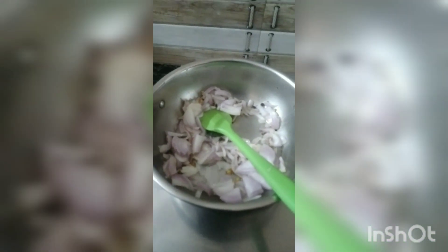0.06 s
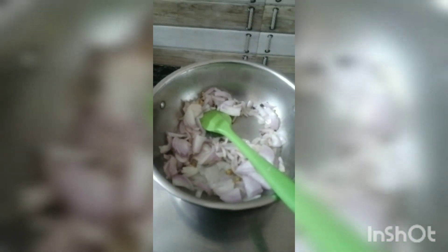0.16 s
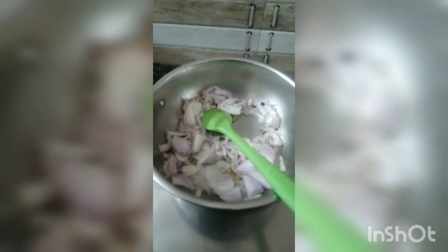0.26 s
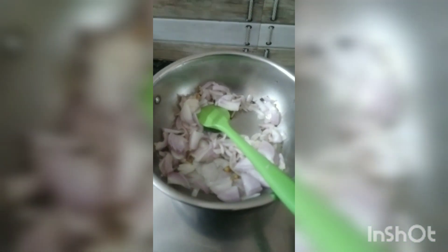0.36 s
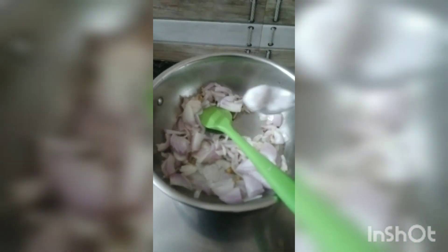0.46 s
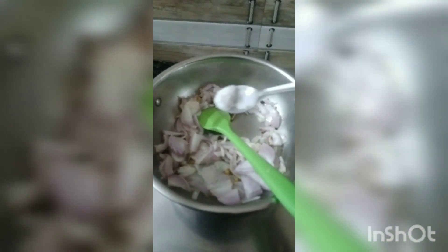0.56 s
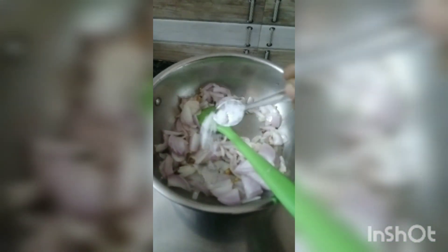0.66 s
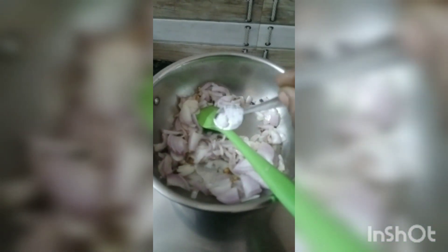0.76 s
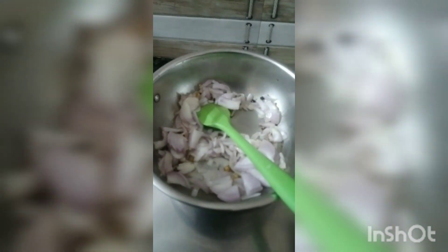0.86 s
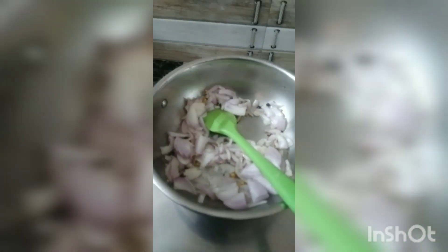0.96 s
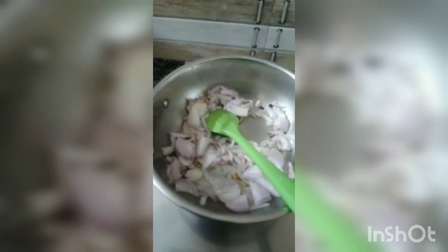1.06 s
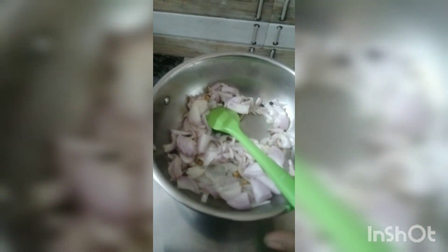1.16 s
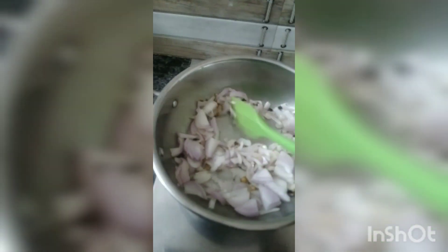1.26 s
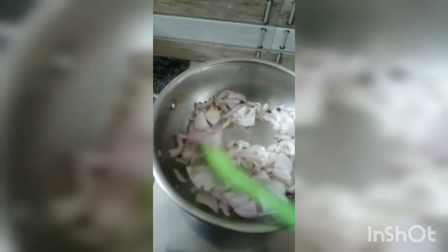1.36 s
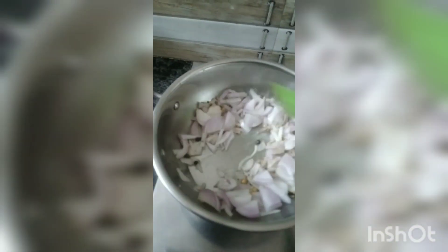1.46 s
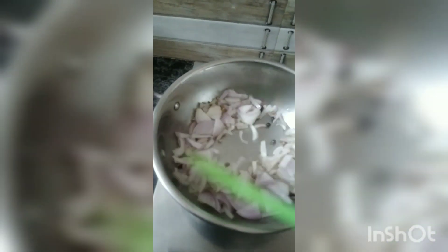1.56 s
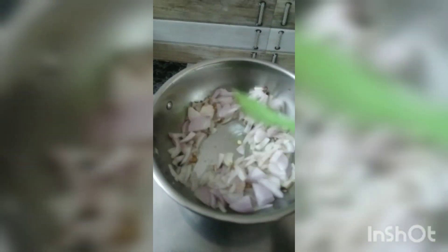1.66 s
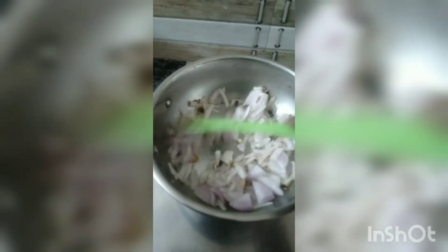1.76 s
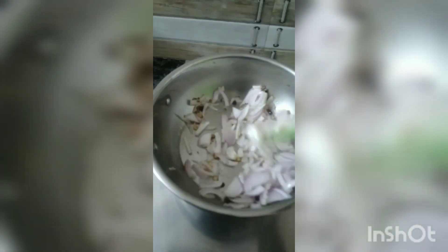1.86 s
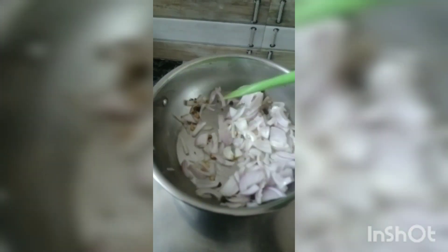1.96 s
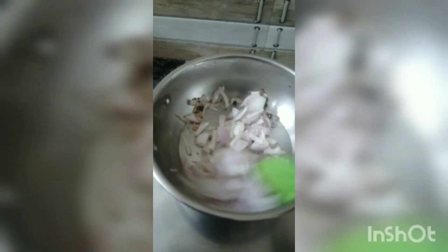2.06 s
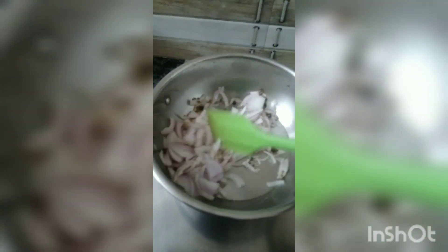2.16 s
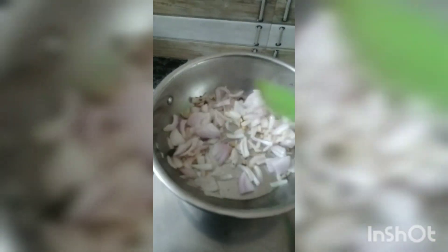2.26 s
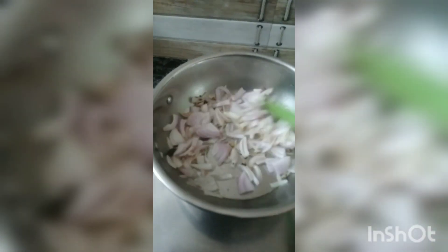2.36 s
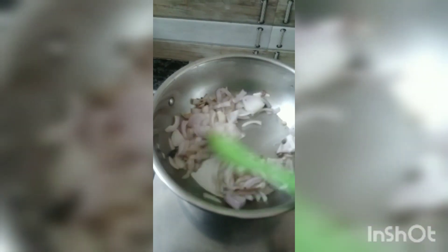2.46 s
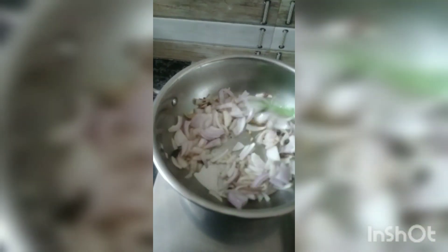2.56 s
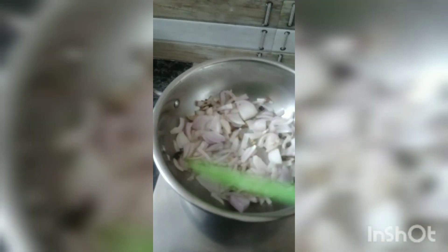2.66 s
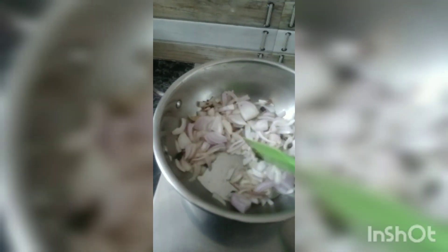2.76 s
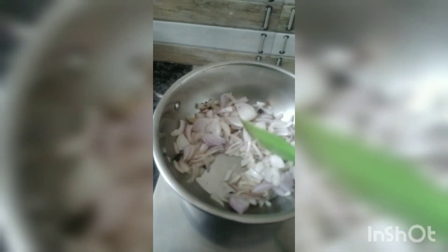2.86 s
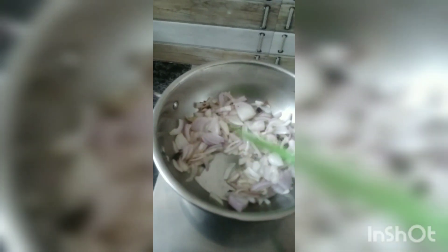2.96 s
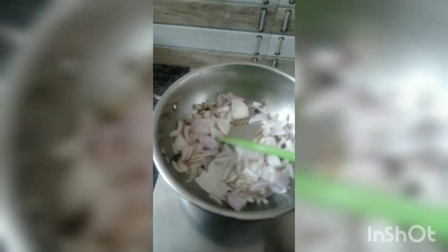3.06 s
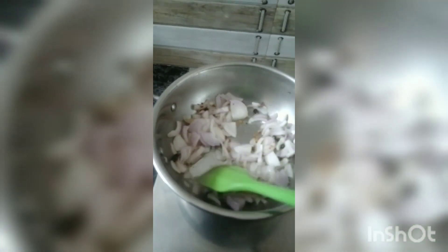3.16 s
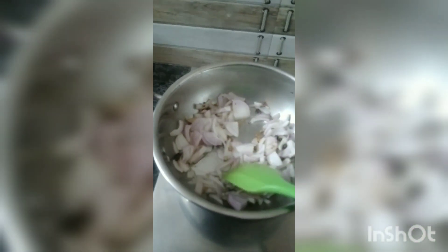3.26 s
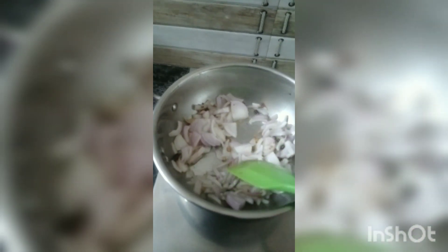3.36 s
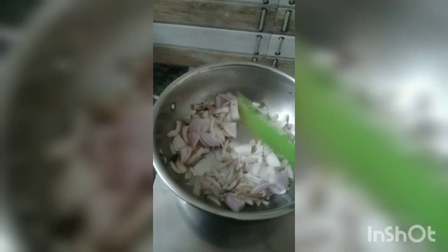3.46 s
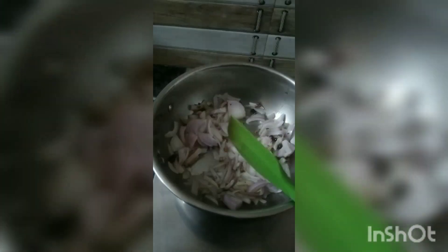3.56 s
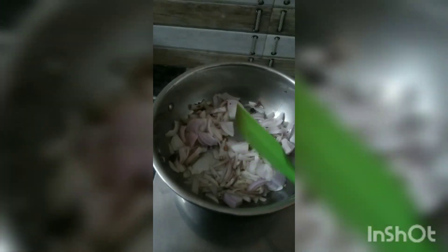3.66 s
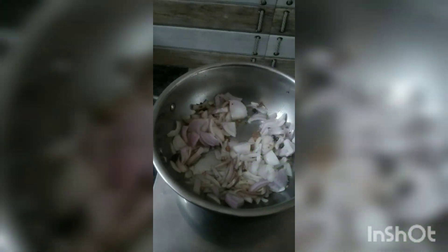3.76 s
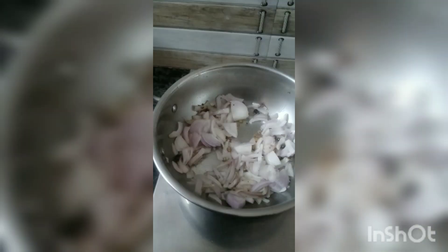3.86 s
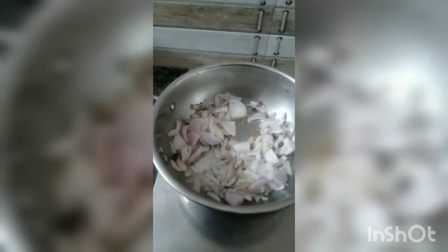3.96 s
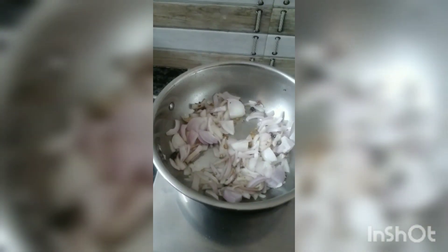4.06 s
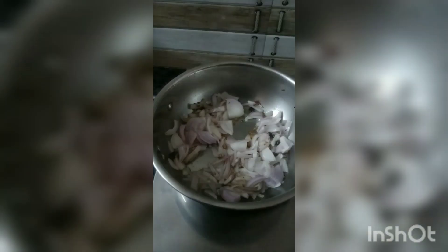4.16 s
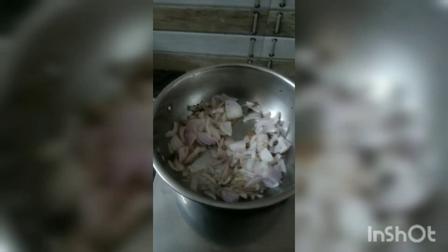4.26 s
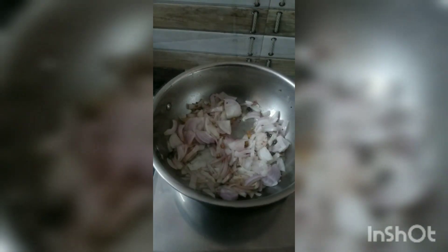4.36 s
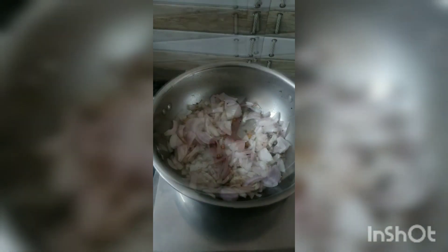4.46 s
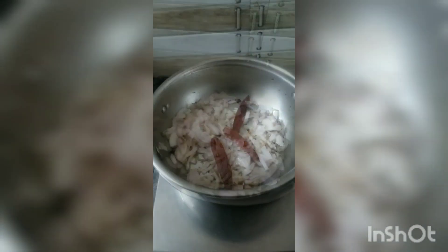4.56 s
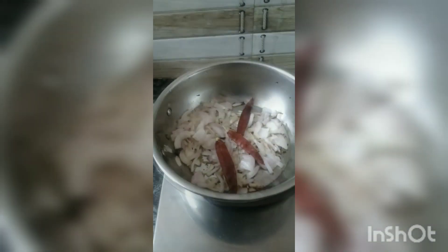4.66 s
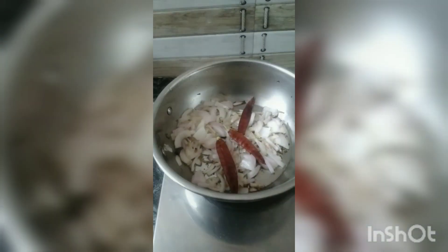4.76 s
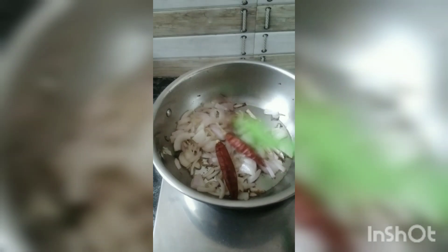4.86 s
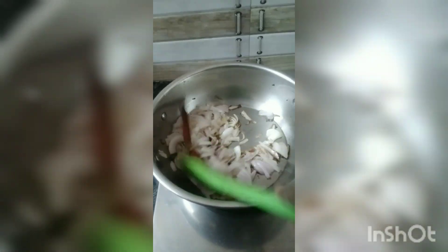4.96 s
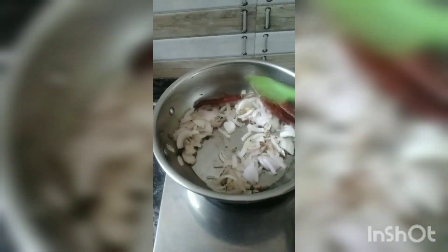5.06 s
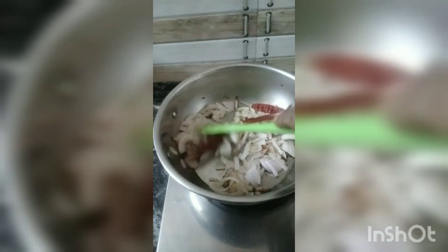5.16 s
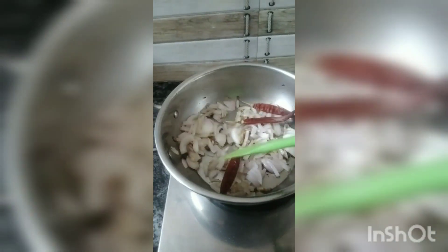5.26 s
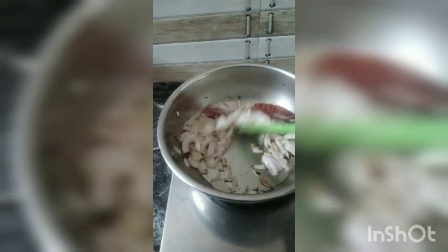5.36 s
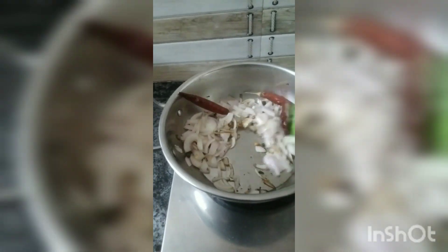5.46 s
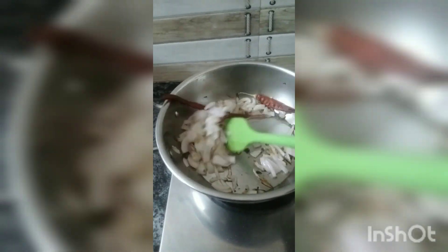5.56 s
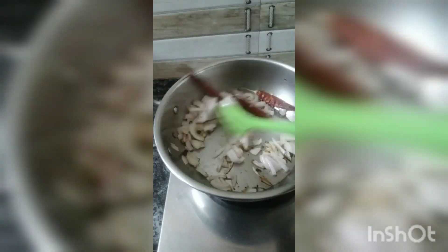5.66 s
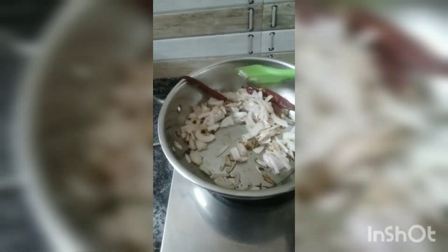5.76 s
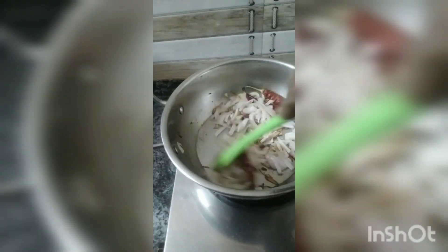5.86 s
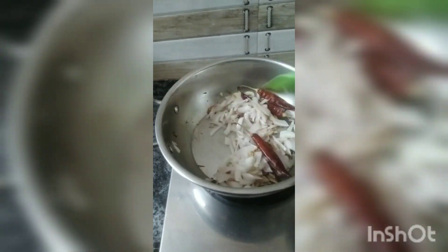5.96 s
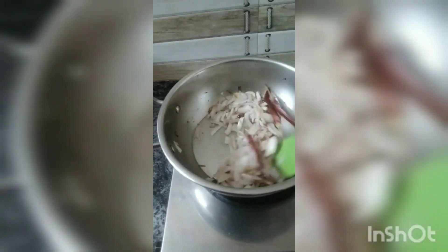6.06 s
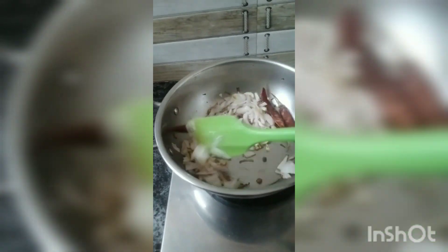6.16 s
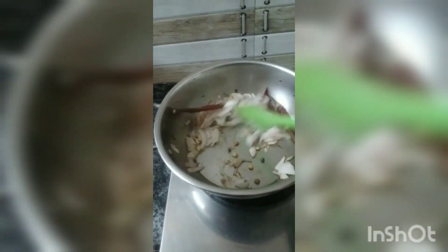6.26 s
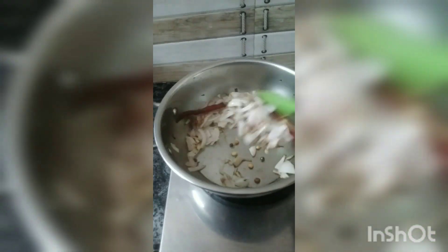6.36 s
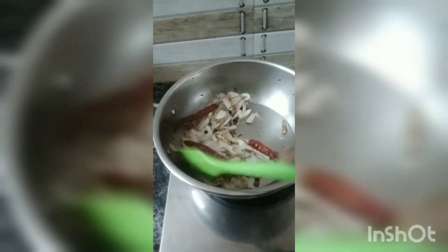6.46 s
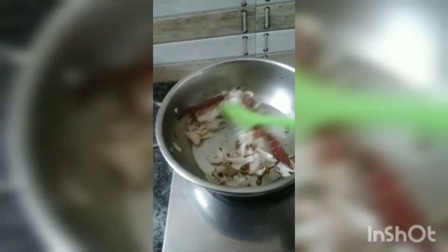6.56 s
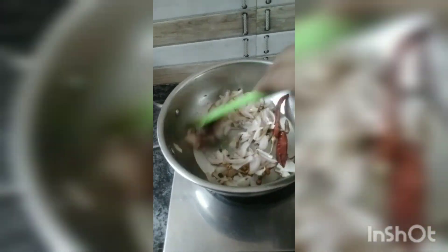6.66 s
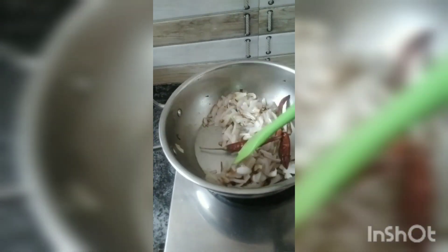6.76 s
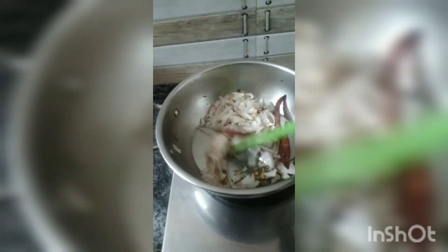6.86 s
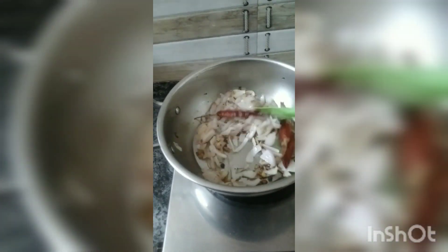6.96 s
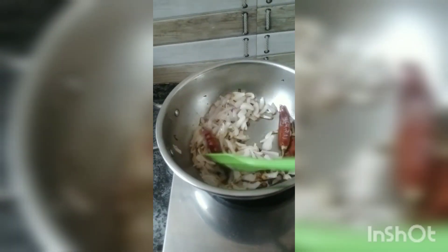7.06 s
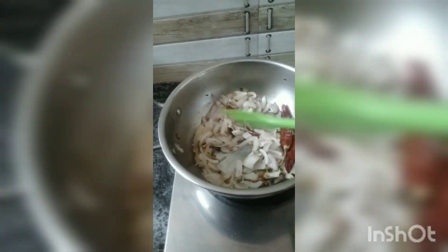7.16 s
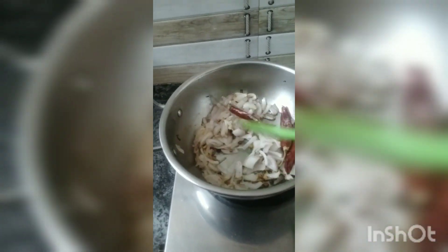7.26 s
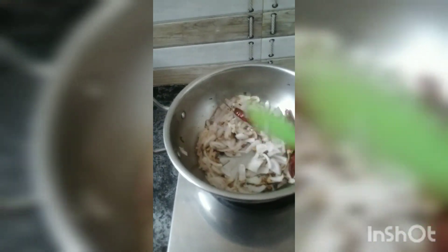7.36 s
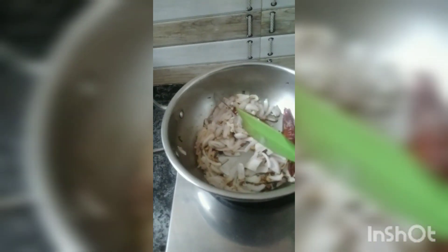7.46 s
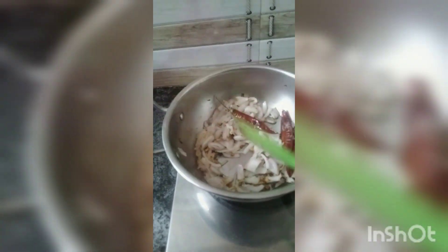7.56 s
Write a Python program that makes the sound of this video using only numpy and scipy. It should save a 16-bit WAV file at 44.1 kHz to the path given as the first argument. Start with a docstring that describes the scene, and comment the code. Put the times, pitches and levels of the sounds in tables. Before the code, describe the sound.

Close to the microphone, onions fry in a steel pan with a fine, quiet sizzle, short hissing flares and sharp spits of oil. After about a second a plastic spatula begins stirring, with soft hollow knocks through the onions and brighter clanks and scrapes on bare metal. The stirring pauses mid-way while the sizzle dips, then hisses up strongly and the stirring resumes. A faint low hum lies beneath in a small hard-walled kitchen.

```python
"""Sliced onions fry in a steel pan on a kitchen hob, close to the microphone, over a low hum.
From the start steam bubbles burst in the oil as filtered random clicks; bursts of hiss flare up,
faint squeaks sound as narrow bands of noise, and single drops spit as short bursts of noise.
After a second a plastic spatula stirs: each blow drives the ringing modes of the pan with noisy
clicks and adds scrape and chatter. Later the pan shifts on its stand with low bumps of noise."""
import sys
import numpy as np
from scipy import signal
from scipy.fft import rfft, irfft
from scipy.io import wavfile

SR = 44100
rng = np.random.default_rng(int(sys.argv[2]) if len(sys.argv) > 2 else 0)


def bounce(signal):
    """Save signal as a 16-bit WAV file at the path given by the first command-line argument."""
    frames = np.transpose(np.atleast_2d(signal))
    limited = np.clip(frames, -1, 1)
    pcm = np.round(limited * 32767).astype(np.int16)
    wavfile.write(sys.argv[1], SR, pcm)


N = 335160  # length in samples

LEAD_S = 0.025  # seconds for the blade to rub in before each blow
FIRM_DB = -32  # thud of a firm blow; chatter level and the contact time of pushes are reckoned from here


def undb(db):
    """Decibels to gain."""
    return 10 ** (np.asarray(db) / 20)


def level(x, db=0):
    """Scale to an rms level in dB."""
    return x * undb(db) / np.sqrt(np.mean(x ** 2) + 1e-20)


def add(out, s, x):
    """Mix x into out from time s in seconds."""
    i = int(np.clip(s * SR, 0, N - 1))
    out[i:i + len(x)] += x[:N - i]


def band(x, lo_hz, hi_hz, order=2):
    """Keep mainly the pitches between two frequencies, using no future samples."""
    edges = np.clip([lo_hz, hi_hz], 10, SR * 0.48)
    return signal.sosfilt(signal.butter(order, edges, "band", fs=SR, output="sos"), x)


def colour(x, points, size=2048):
    """Filter through (Hz, dB) points, with a response that starts at once (minimum phase)."""
    hz, db = np.transpose(points)
    grid = np.maximum(np.arange(size // 2 + 1) * SR / size, 1)
    gain = undb(np.interp(np.log(grid), np.log(hz), db))
    # folding the cepstrum forward moves the whole response after time zero
    cepstrum = irfft(np.log(gain))
    cepstrum[1:size // 2] *= 2
    cepstrum[size // 2 + 1:] = 0
    response = irfft(np.exp(rfft(cepstrum)))
    return signal.fftconvolve(x, response)[:len(x)]


def walk(rate, n=N):
    """Smooth random wander with a spread near 1 and `rate` new targets a second."""
    steps = rng.standard_normal(2000)
    return np.interp(np.arange(n) * rate / SR, np.arange(len(steps)), steps)


def grains(n, rate, spread_db):
    """Random clicks of either sign, about `rate` a second, many small and a few large."""
    chance = rng.uniform(-1, 1, n)
    at = np.flatnonzero(np.abs(chance) < rate / SR)
    rarity = np.minimum(-np.log(np.abs(chance[at]) * SR / rate), 6)
    clicks = np.zeros(n)
    clicks[at] = np.sign(chance[at]) * undb(spread_db * rarity)
    return level(clicks)


def fade(t, t60):
    """Exponential decay that falls by 60 dB in t60 seconds."""
    return undb(-60 * t / t60)


def swell(start, end, edge):
    """A gate with soft edges, beginning at its start time."""
    t = np.arange(int(max(end - start, edge) * SR) + 1) / SR
    to_nearest_end = np.minimum(t, t[-1] - t)
    return np.sin(np.pi / 2 * np.clip(to_nearest_end / edge, 0, 1))


def bubbling(edges, rate, spread_db, flicker_db, flicker_rate):
    """Random clicks ring briefly, each in its own band, and every band flickers in level."""
    total = np.zeros(N)
    for lo_hz, hi_hz in zip(edges, edges[1:]):
        ringing = band(grains(N, rate, spread_db), lo_hz, hi_hz)
        total += ringing * undb(flicker_db * walk(flicker_rate))
    return level(total)


def pops():
    """Frequent dry ticks, about 120 a second, most small and a few large."""
    t = np.arange(SR // 50) / SR
    # a very short snap with a weaker, longer tail
    tick = rng.standard_normal(len(t)) * (fade(t, 0.0015) + undb(-13) * fade(t, 0.03))
    ticks = signal.fftconvolve(grains(N, rate=120, spread_db=2.5), tick)[:N]
    return level(colour(ticks, [(2000, -20), (5000, -28), (9500, 17), (12000, 6), (15800, -27)]))


def wetness():
    """Gain of the rustle: faint while the slices rest, renewed as each turn puts a wet side down."""
    # Each row: start of a turn in seconds, rustle in dB relative to the sizzle.
    turns = [(1.36, 1), (4.78, -3.5)]
    rise_s, drying_s = 0.023, 0.68  # a fast rise, then a slow decay as the slices dry
    resting_db = -14
    t = np.arange(N) / SR
    fresh = np.zeros(N)
    for s, db in turns:
        rise = np.clip((t - s) / rise_s, 0, 1)
        drying = np.exp(-np.maximum(t - s, 0) / drying_s)
        fresh += undb(db) * rise * drying
    return np.hypot(undb(resting_db), fresh)


def sizzle():
    """Steady bubbling, crackle and fine spray in the oil; turning the slices adds wet rustle."""
    # Tone of the oil, the rustle and the spray. Each row: frequency in Hz, level in dB.
    oil_tone = [(500, -14.5), (900, -10), (1350, -6.5), (1800, -18.5), (2400, -13), (3400, -9), (4400, -9),
                (5100, -2.5), (6200, -1.5), (7600, 2.5), (8900, 3.5), (10500, -2.5), (12000, -7),
                (15800, -6.5)]
    rustle_tone = [(200, -25.5), (500, -6), (1200, -2), (1750, -6.5), (2500, 0.5), (3600, 1.5), (5000, -2),
                   (9000, -25)]
    spray_tone = [(7000, -41), (10500, -38), (13000, -7), (15800, 11)]
    # How hard the onions fry. Each row: time in seconds, level of the oil in dB.
    heat = [(0, -51), (1.28, -53), (1.5, -47), (1.85, -43), (2.17, -47.5), (2.4, -44.5), (3.1, -48.5),
            (3.7, -51.5), (4.18, -51.5), (4.421, -46), (4.51, -58), (4.8, -57), (5.0, -41), (5.55, -48),
            (5.8, -43.5), (6.35, -47.5), (6.6, -45), (7.25, -50)]
    heat_db = np.interp(np.arange(N) / SR, *np.transpose(heat))
    # band edges in Hz, one band for each bubble size
    fine, coarse = np.linspace(300, 16500, 8), np.geomspace(300, 9000, 8)

    bubbles = bubbling(fine, rate=2600, spread_db=1.5, flicker_db=3.5, flicker_rate=51)
    crackle = grains(N, rate=380, spread_db=2.5)
    oil = level(colour(bubbles + level(crackle, -4), oil_tone))

    squelch = bubbling(coarse, rate=1100, spread_db=1, flicker_db=8, flicker_rate=40)
    squelch = squelch + level(grains(N, rate=300, spread_db=4), -2)
    squelch = squelch * undb(2 * walk(30))
    rustle = level(colour(squelch, rustle_tone)) * wetness()

    droplets = grains(N, rate=13000, spread_db=2)
    spray = level(colour(droplets, spray_tone), -30.5) * undb(5.2 * walk(12))
    ticks = level(pops(), -15)
    return (oil + rustle + spray + ticks) * undb(heat_db + 0.2 * walk(8.9))


def kitchen():
    """A low hum with a slightly unsteady pitch and a narrow drone, over soft room noise."""
    # Tone of the room noise. Each row: frequency in Hz, level in dB.
    room_tone = [(25, -7), (60, -20.5), (110, -22), (160, -14.5), (300, -20.5), (600, -11.5), (1300, -17.5),
                 (2500, -16), (8000, -28.5)]
    hum_hz = 109 * (1 + 0.03 * walk(25))
    hum = level(np.sin(2 * np.pi * np.cumsum(hum_hz) / SR), -69)
    drone = level(band(rng.standard_normal(N), 73, 119), -69.5)
    room = level(colour(rng.standard_normal(N), room_tone), -69.5)
    return hum + drone + room


def flares():
    """Bursts of uneven hiss with soft edges, each centred on its own pitch."""
    # Each row: start in seconds, length in seconds, level in dB, centre of the hiss in Hz.
    bursts = [(0.088, .035, -46, 7500), (0.302, 0.038, -34, 7040), (0.809, 0.032, -51, 2920),
              (0.88, 0.041, -54, 2630), (1.116, 0.032, -37, 6000), (1.142, .043, -46.5, 6100),
              (1.353, 0.017, -47, 4600), (1.403, 0.019, -43.5, 3320), (1.459, 0.039, -48, 2600),
              (1.513, 0.03, -44, 8600), (1.686, 0.036, -35.5, 9650), (1.824, 0.046, -40.5, 7400),
              (4.242, 0.027, -51.5, 3040), (4.795, 0.67, -45, 6600), (4.908, 0.054, -34, 7200),
              (4.985, 0.32, -38.5, 10900), (4.993, 0.32, -42, 13400), (5.126, 0.16, -29.5, 8660)]
    half_width_hz = 3340 / 2
    out, edges = np.zeros(N), np.geomspace(600, 16500, 10)
    source = bubbling(edges, rate=5800, spread_db=2.5, flicker_db=5.5, flicker_rate=55)
    source = source + undb(-12) * grains(N, rate=500, spread_db=2.5)
    for start, length, db, hz in bursts:
        # long bursts have longer soft edges
        gate = swell(start, start + length, edge=0.0039 + 0.1 * length)
        stretch = source[int(start * SR):][:len(gate)]
        main = level(band(stretch, max(hz - half_width_hz, 800), hz + half_width_hz))
        wide = level(band(stretch, 1800, 22000), -10.5)
        add(out, start, level(gate * (main + wide), db))
    return out


def tones(table, width):
    """Unsteady, roughly pitched sounds that swell and die away; width is a share of the pitch."""
    out, noise = np.zeros(N), rng.standard_normal(N)
    for start, end, hz, db in table:
        gate = swell(start, end, edge=(end - start) / 2)
        stretch = np.roll(noise, -int(start * SR))[:SR]
        tone = band(stretch, hz / (1 + width / 2), hz * (1 + width / 2))
        # the last part is used, once the filter has settled
        add(out, start, level(gate * tone[-len(gate):], db))
    return out


def squeaks():
    """Faint squeaks, made from narrow bands of noise."""
    # Each row: start in seconds, end in seconds, pitch in Hz, level in dB.
    squeak_table = [(.3, .47, 580, -65), (.58, .75, 585, -65), (6.86, 7.12, 1053, -60)]
    return tones(squeak_table, width=0.099)


def spits():
    """A drop bursts with a sharp snap, pings the pan and scatters a short spatter."""
    # Each row: start in seconds, level of the snap in dB, then the pan's ping and the spatter,
    # both in dB relative to the snap.
    drops = [(.31, -27, -7.5, -5), (0.5632, -27, -36, -5.5), (0.5734, -29.5, -31, 3),
             (.8225, -56, 5.5, -12), (.92, -17.5, -18, -18), (1.1201, -48, 10, -16), (1.131, -51, 6, -3),
             (1.5307, -35.5, -7.5, -4), (1.6774, -33.5, -16, -2), (1.8267, -30, -27, -17),
             (3.821, -50.5, -1.5, 4), (4.248, -44, -4, 0.5), (6.853, -36.5, -22, -12)]
    # tones as (Hz, dB)
    snap_tone = [(1500, -79), (4500, -11), (6000, -15), (8200, 6.5), (10500, 2), (15500, -7.5)]
    ping_tone = [(400, -10.5), (700, 4.5), (950, 21), (1300, 15),
                 (1700, 3), (2800, 8.5), (5000, 4), (9000, -15)]
    spatter_tone = [(1500, -54), (4500, 2), (5500, 9.5), (8500, 17), (10500, 13), (15500, -46)]
    out, t = np.zeros(N), np.arange(SR // 10) / SR
    first = 3 * SR // 1000  # levels are set over the first 3 ms
    for s, db, ping_db, spatter_db in drops:
        noise = rng.standard_normal((3, len(t)))
        snap = colour(noise[0] * fade(t, 0.0082), snap_tone)
        ping = colour(noise[1] * fade(t, 0.029), ping_tone)
        spatter = colour(noise[2] * fade(t, 0.098), spatter_tone)
        for part, part_db in [(snap, 0), (ping, ping_db), (spatter, spatter_db)]:
            add(out, s, part * undb(db + part_db) / part[:first].std())
    return out


def blow(db, clang_db, contact, scrape_db, rock_db, ring_share=1):
    """The blade rubs in, presses and lets go; the pan rings in its modes and chatters on its stand."""
    # Modes of the loaded pan before each blow varies them.
    # Each row: frequency in Hz, level in dB, seconds to fall by 60 dB.
    pan_modes = [(317, -17.5, 0.11), (346.3, -27.5, 0.32), (398.6, -13, 0.13), (467, -3.5, 0.13),
                 (523, 3.5, 0.1), (556, 0, 0.12), (614, -14, 0.12), (698, -12, 0.05), (801.4, 2.5, 0.073),
                 (894, -1, 0.11), (953, -0.5, 0.091), (1015, -5.5, 0.1), (1240, -5, 0.067),
                 (1361, -1.5, 0.094), (1380, -17, .05), (1724, -5.5, 0.045), (1790, -39, 0.078),
                 (1674, 3, 0.029), (1882, -2.5, 0.017), (1940, -27, 0.057), (2150, -8, 0.038)]
    # Tone of the dense, quickly damped ring of pan and stand. Each row: frequency in Hz, level in dB.
    clatter_tone = [(40, -9.5), (80, -19), (170, -21.5), (250, -23.5), (310, -1.5), (550, -2), (900, 1.5),
                    (1900, 1.5), (2350, -4), (2800, -10), (3500, -1.5), (4700, -7.5), (5500, -1),
                    (7400, -1), (8500, -13.5), (14000, -35)]
    t = np.arange(SR // 6) / SR
    lead, first = int(LEAD_S * SR), SR // 50  # levels are set over 20 ms from the blow
    since = t - lead / SR

    # a soft blow rises in 5.8 ms, a harder one faster: half that at a hardness of 8 dB
    attack = 0.0058 / (1 + undb(clang_db - 8) ** 4)
    rise = np.exp(np.minimum(since - attack / 2, 0) / max(attack, 0.0005))
    release = np.exp(-(np.maximum(since, 0) / max(contact, 0.001)) ** 2)
    force = grains(len(t), rate=1500, spread_db=2.5) * rise * release
    # one clean impact as well, stronger in a fast blow
    force[lead] += np.linalg.norm(force) * np.exp(-attack / 0.0056)

    # the place of contact weights and detunes the modes anew
    hz, mode_db, t60 = np.transpose(pan_modes)[:, :, None]
    chance = rng.standard_normal((3, len(pan_modes), 1))
    gain = undb(mode_db + 0.9 * chance[0]) * np.sign(chance[1])
    waves = np.sin(2 * np.pi * hz * (1 + 0.0047 * chance[2]) * t)
    modes = gain * fade(t, t60 * ring_share) * waves
    ring = signal.fftconvolve(force, modes.sum(axis=0))[:len(t)]

    # the chatter is noise that follows the energy of the force
    energy = signal.fftconvolve(force ** 2, fade(t, 0.06) ** 2)[:len(t)]
    shaking = np.sqrt(np.abs(energy))
    clatter = colour(rng.standard_normal(len(t)) * shaking, clatter_tone)
    chatter_db = -0.5 + 0.27 * (db - FIRM_DB)  # relative to the ring; firmer blows chatter more
    x = level(ring) + level(clatter, chatter_db)

    # hard blows clang higher up; the edge of the blade scrapes and the stand rocks
    top_hz = np.clip(2680 * undb(0.28 * clang_db), 1100, 5000)
    rock = band(x, 35, 270, order=4)
    thud = band(x, 270, 720, order=4)
    clang = band(x, 700, top_hz, order=4)
    scrape = band(x, 2600, 12500, order=4)
    parts = [(thud + undb(rock_db) * rock, db),
             (clang, db + clang_db),
             (scrape, db + clang_db + scrape_db)]
    return sum(part * undb(part_db) / part[lead:lead + first].std() for part, part_db in parts)


def knocks():
    """Pushes are cushioned by the onions; strikes on bare steel scrape and rock the pan."""
    # The spatula pushes through the onions.
    # Each row: time in seconds, thud in dB, hardness (clang in dB relative to the thud).
    pushes = [(1.051, -45, -4), (1.213, -38.5, -10), (1.285, -64.5, 10), (1.493, -41.5, -5.5),
              (1.708, -39.5, -10), (1.843, -36, -10), (1.883, -39, -5), (1.979, -41.5, -8),
              (2.003, -33.5, -12.5), (2.028, -38.5, -8.5), (2.0773, -30.5, 1), (2.322, -33.5, -2.5),
              (2.564, -44.5, -29), (2.671, -48, -32), (3.026, -40.5, -15), (3.283, -38.5, -13.5),
              (3.303, -40.5, 3), (3.351, -43.5, -17), (3.37, -32.5, 2.5), (3.586, -34, -4),
              (3.608, -33, 2.5), (4.803, -47.5, -6), (4.942, -47, -2), (5.244, -44, -4),
              (5.43, -37.5, -0.5), (5.976, -34, -5.5), (6.034, -29.5, 5.5), (6.171, -41, -11.5),
              (6.333, -43, -13), (6.451, -39, -9.5), (6.778, -47, 5), (6.916, -42, -12.5)]
    # Its edge strikes bare steel and jolts the pan.
    # Each row: time in seconds, thud in dB, hardness as above, contact time in seconds.
    strikes = [(2.908, -33.5, -3, 0.023), (2.934, -31, 1.5, 0.017), (3.47, -28.5, -2.5, 0.023),
               (3.495, -27, 1.5, 0.01), (3.536, -29, -0.5, 0.0059), (3.547, -30.5, 3, 0.0079),
               (5.289, -35.5, 3, 0.018), (7.332, -28.5, 1, 0.011), (7.354, -33.5, 8.5, 0.024),
               (7.401, -33.5, 3, 0.035), (7.454, -28.5, 2.5, 0.024), (7.474, -30, 3, 0.021),
               (7.515, -37.5, -2.5, 0.093), (7.546, -32, 5, .008), (7.586, -28, -0.5, 0.007)]
    out = np.zeros(N)
    # scrape_db is relative to the clang, rock_db a gain on the low rocking of the stand
    for s, db, clang_db in pushes:
        contact = 0.018 * undb(0.58 * (db - FIRM_DB))  # seconds; firmer pushes stay longer
        # the onions leave 86 percent of the pan's ring time
        push = blow(db, clang_db, contact, scrape_db=-17, rock_db=-4.5, ring_share=0.86)
        add(out, s - LEAD_S, push)
    for s, db, clang_db, contact in strikes:
        strike = blow(db, clang_db, contact, scrape_db=-6, rock_db=3.5)
        add(out, s - LEAD_S, strike)
    return out


def bumps():
    """Low bumps as the pan shifts on its stand, made from bands of noise."""
    # Each row: start in seconds, end in seconds, pitch in Hz, level in dB.
    bump_table = [(2.895, 2.98, 79, -48), (3.46, 3.6, 84, -47.5), (4.2, 4.55, 104.4, -56),
                  (6.34, 6.45, 61.6, -57), (7.08, 7.19, 63, -56.5), (7.165, 7.23, 109, -50.5),
                  (7.435, 7.55, 67, -46)]
    return tones(bump_table, width=0.35)


def reflections(x):
    """A short tail of sound thrown back by the tiled walls, as fading noise after a 4 ms gap."""
    t = np.arange(SR // 3) / SR
    walls = band(rng.standard_normal(len(t)), 290, 6000) * fade(t, 0.1) * (t > 0.004)
    return signal.fftconvolve(x, walls / np.linalg.norm(walls))[:N]


def scene():
    """The pan and its reflections, with the bumps and the kitchen's low sound added dry."""
    pan = sizzle() + flares() + squeaks() + spits() + knocks()
    tail = undb(-19) * reflections(pan)
    mix = pan + tail + bumps() + kitchen()
    return mix[None]  # one channel


def record(dry):
    """A steep low-pass filter cuts the treble above 15850 Hz."""
    return signal.sosfilt(signal.ellip(10, 0.2, 75, 15850, fs=SR, output="sos"), dry)


dry = scene()
out = record(dry)
bounce(out)
```